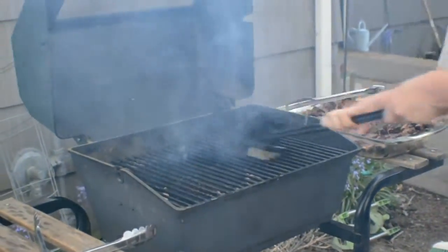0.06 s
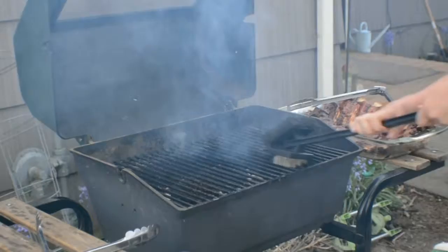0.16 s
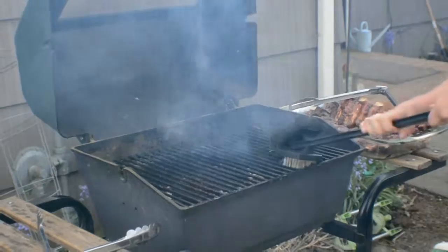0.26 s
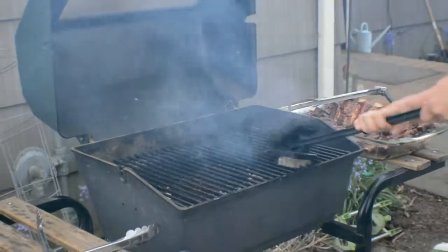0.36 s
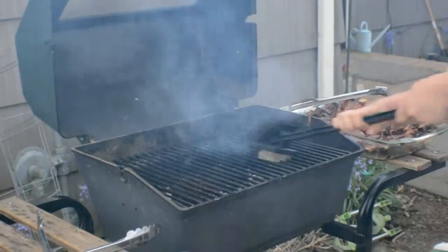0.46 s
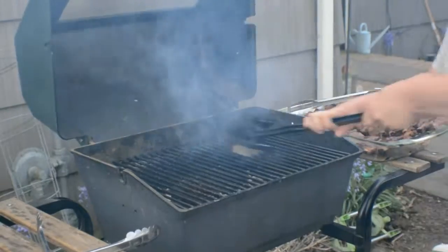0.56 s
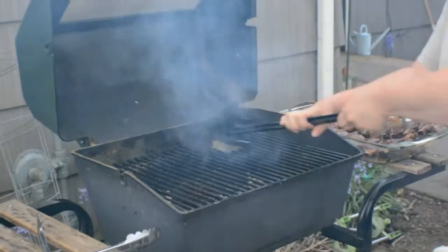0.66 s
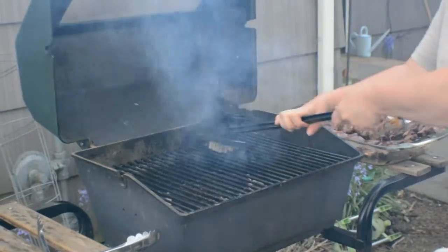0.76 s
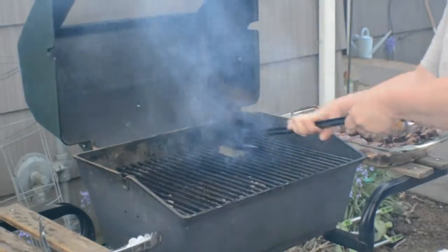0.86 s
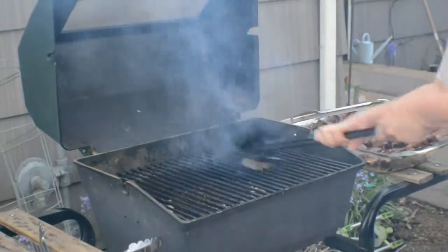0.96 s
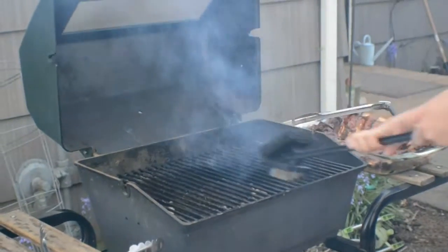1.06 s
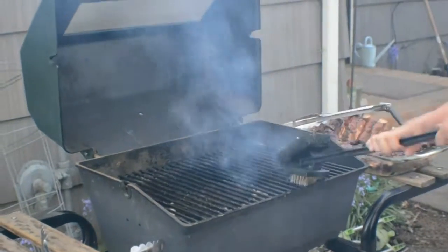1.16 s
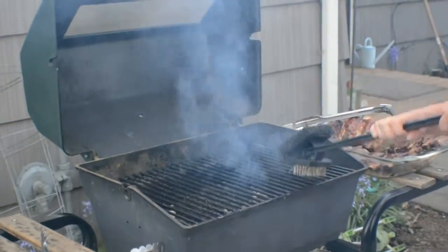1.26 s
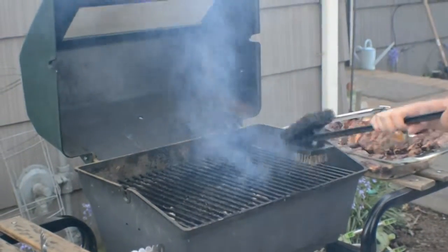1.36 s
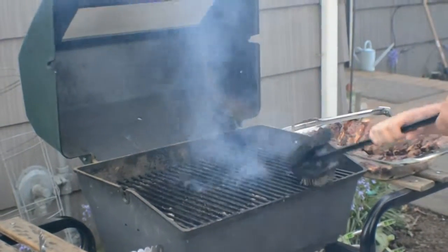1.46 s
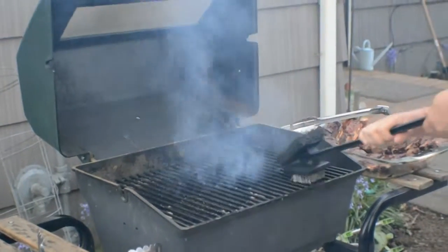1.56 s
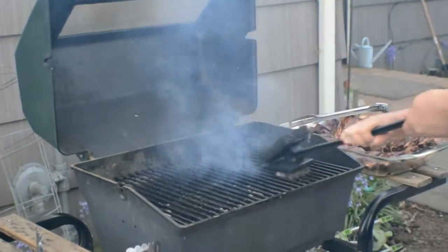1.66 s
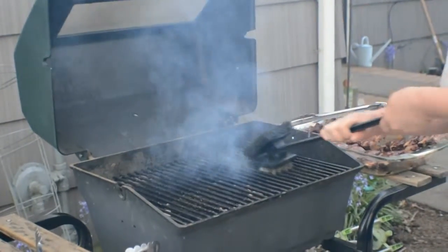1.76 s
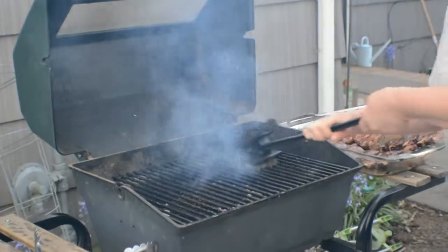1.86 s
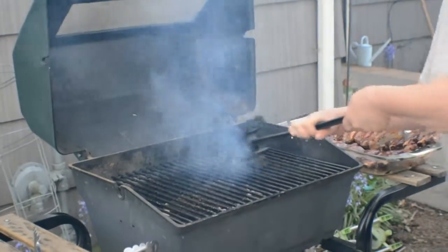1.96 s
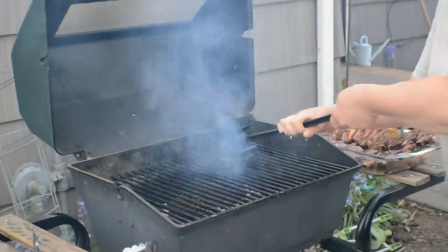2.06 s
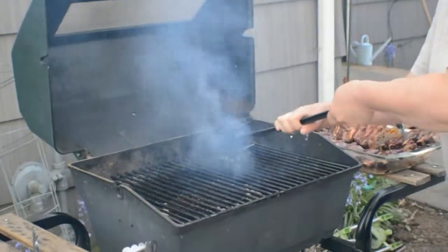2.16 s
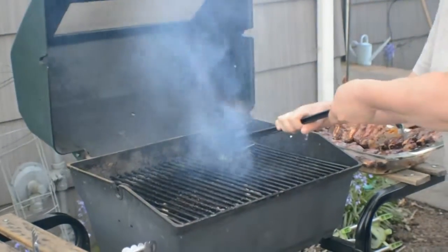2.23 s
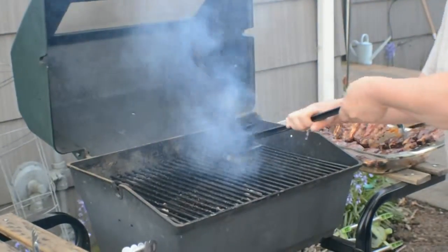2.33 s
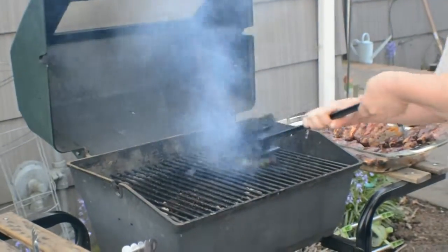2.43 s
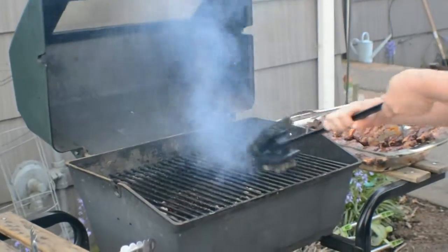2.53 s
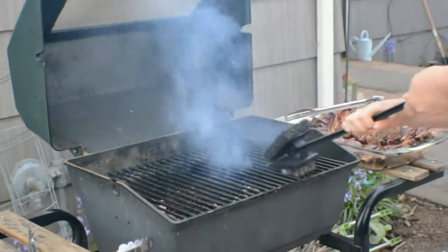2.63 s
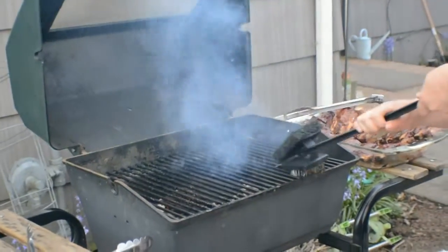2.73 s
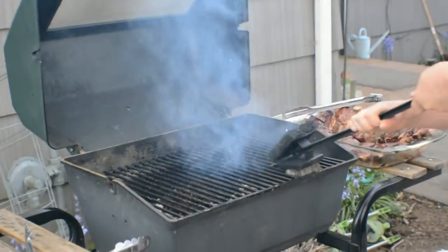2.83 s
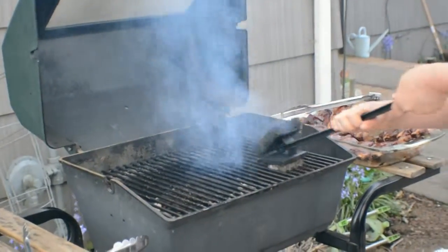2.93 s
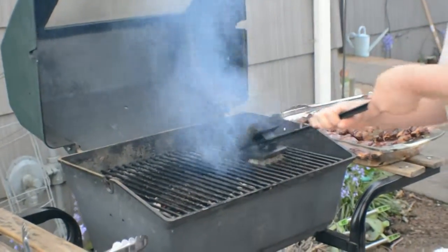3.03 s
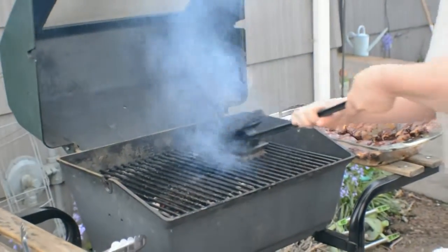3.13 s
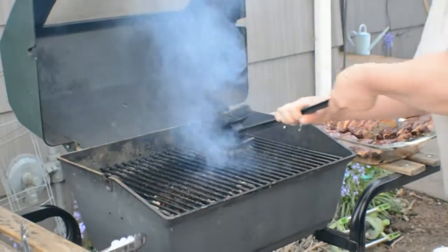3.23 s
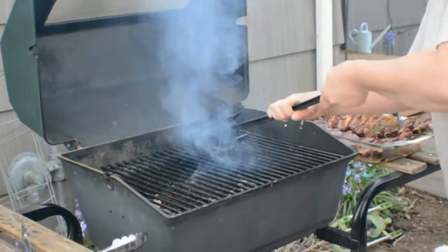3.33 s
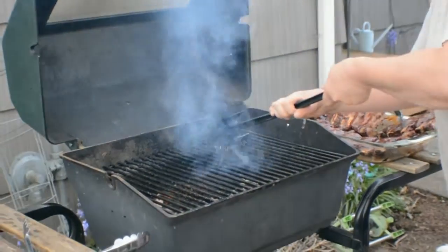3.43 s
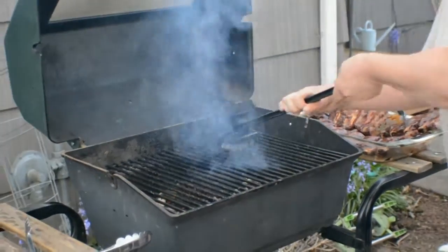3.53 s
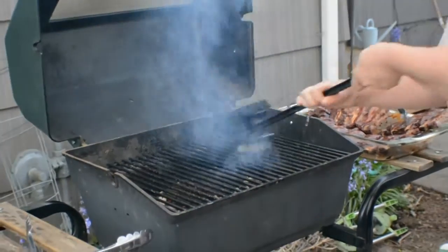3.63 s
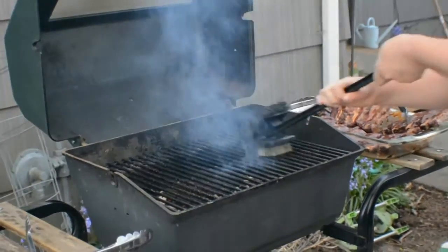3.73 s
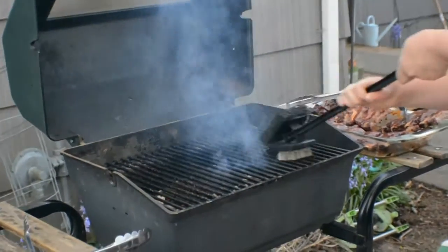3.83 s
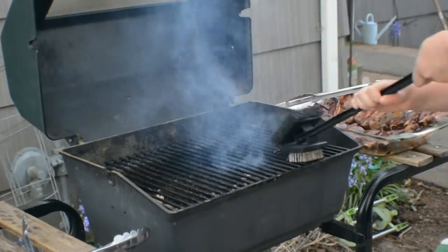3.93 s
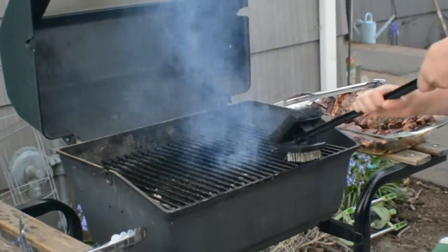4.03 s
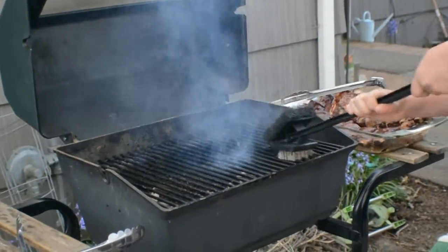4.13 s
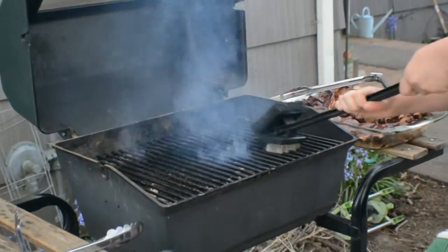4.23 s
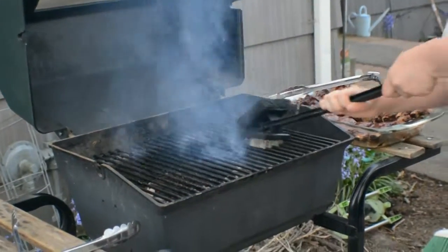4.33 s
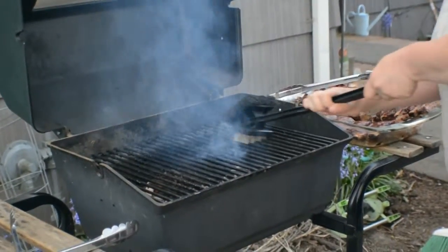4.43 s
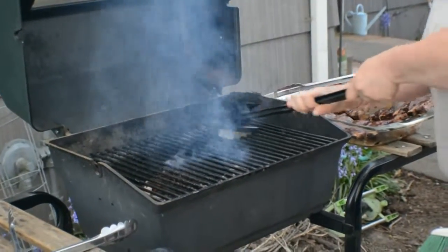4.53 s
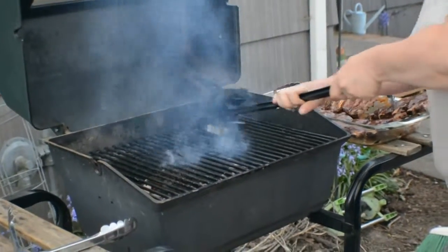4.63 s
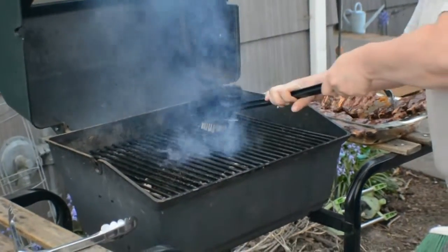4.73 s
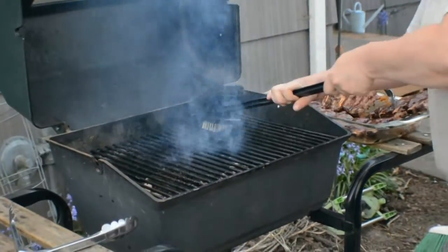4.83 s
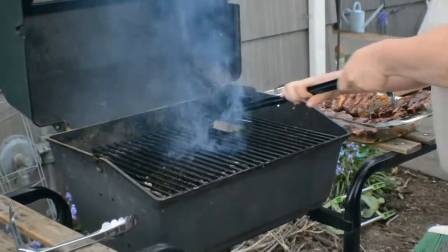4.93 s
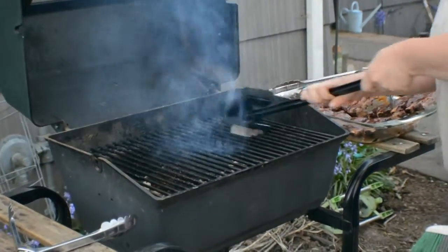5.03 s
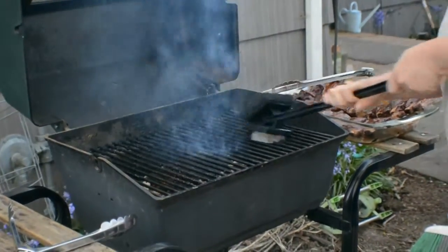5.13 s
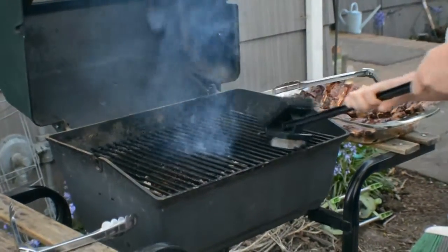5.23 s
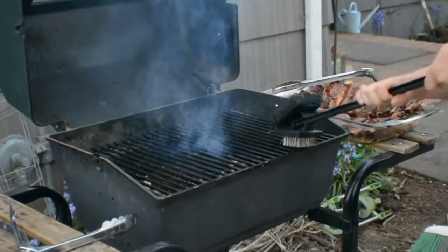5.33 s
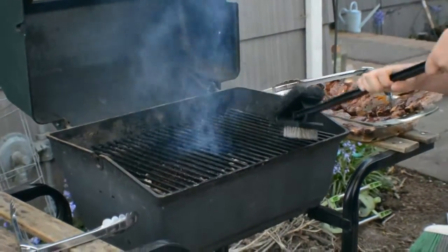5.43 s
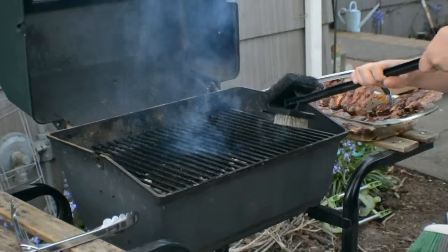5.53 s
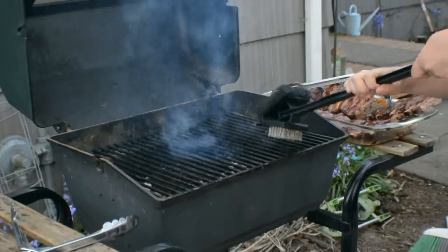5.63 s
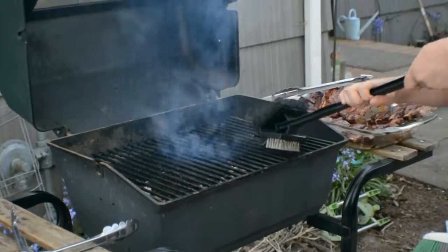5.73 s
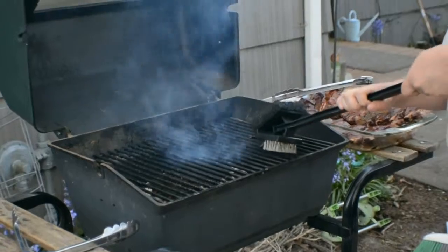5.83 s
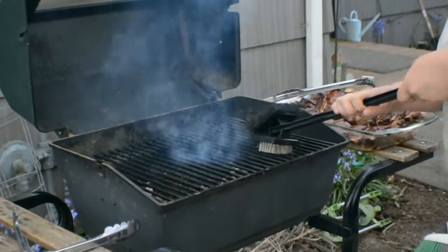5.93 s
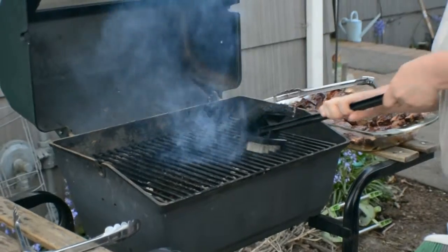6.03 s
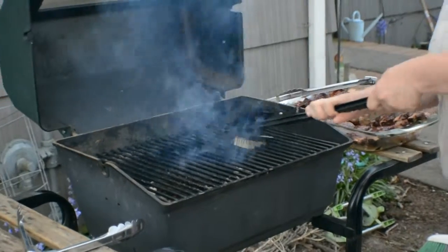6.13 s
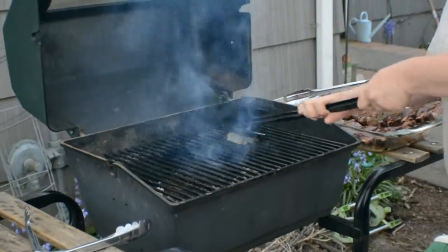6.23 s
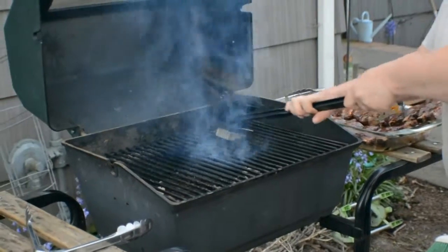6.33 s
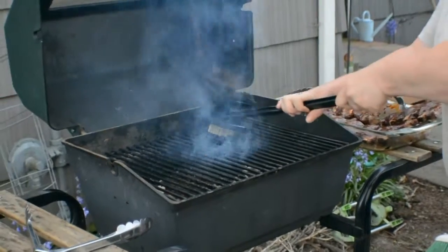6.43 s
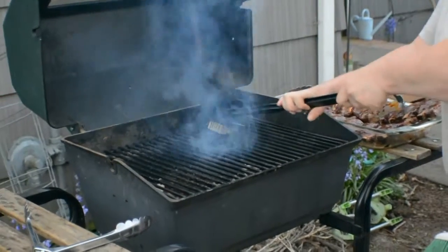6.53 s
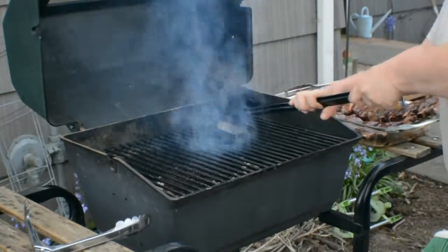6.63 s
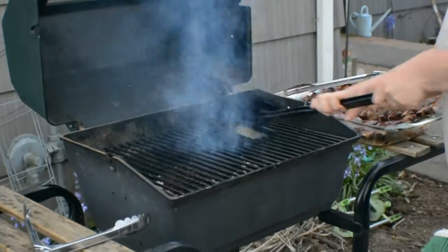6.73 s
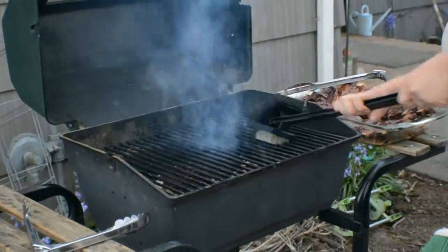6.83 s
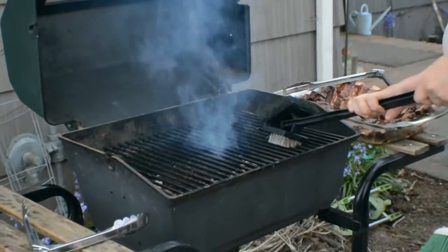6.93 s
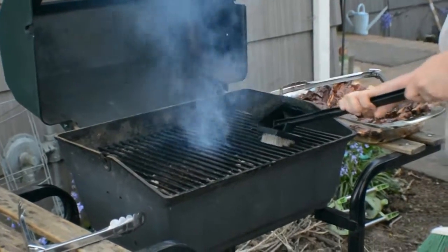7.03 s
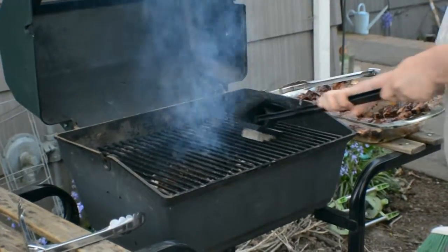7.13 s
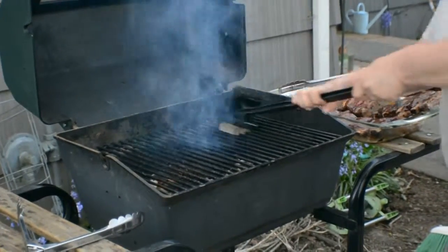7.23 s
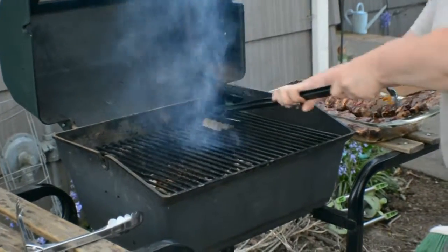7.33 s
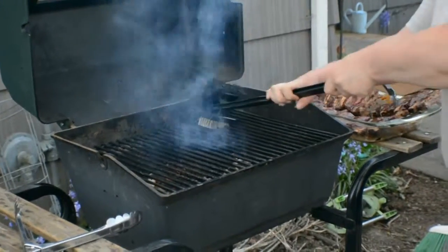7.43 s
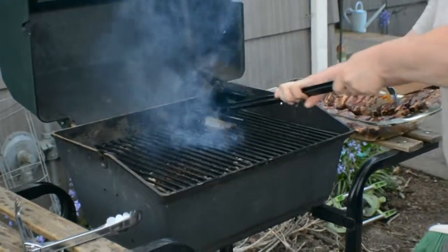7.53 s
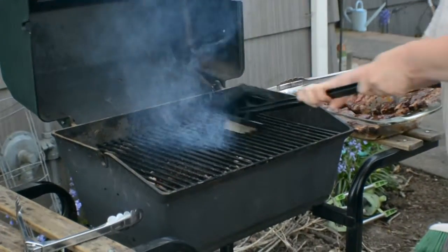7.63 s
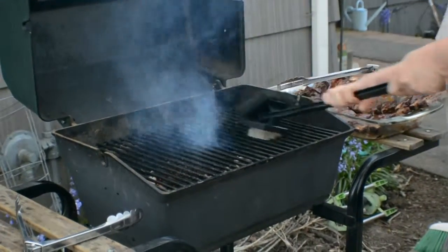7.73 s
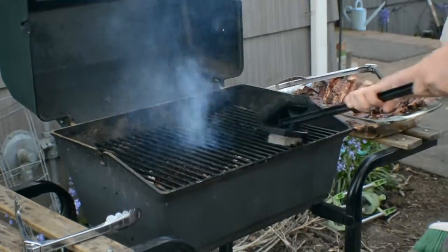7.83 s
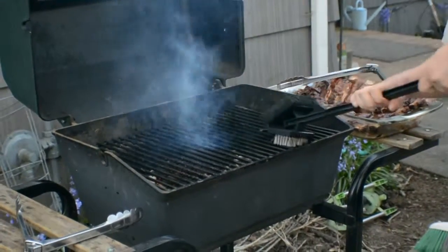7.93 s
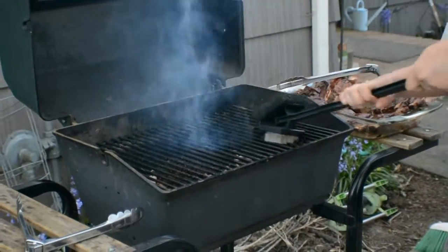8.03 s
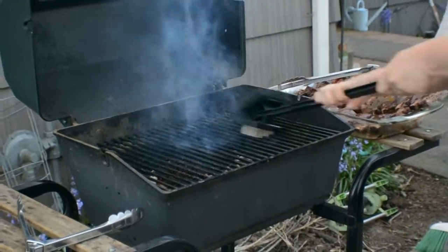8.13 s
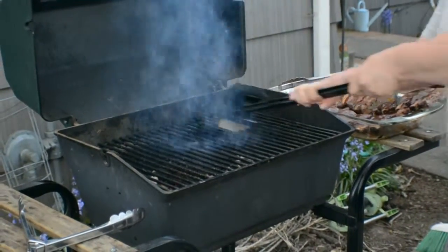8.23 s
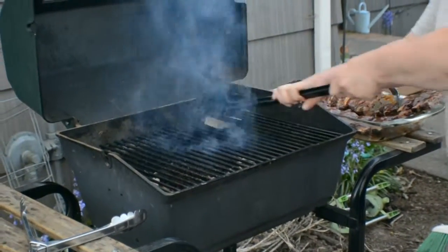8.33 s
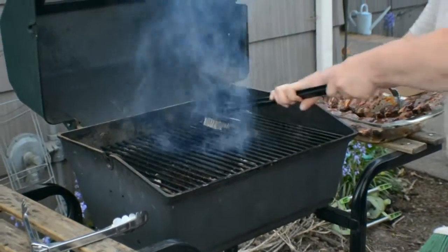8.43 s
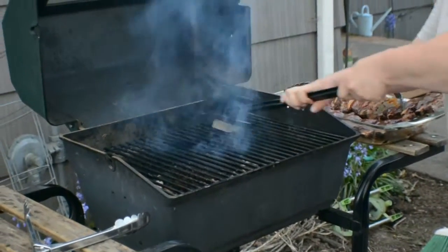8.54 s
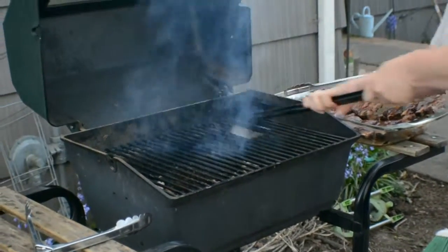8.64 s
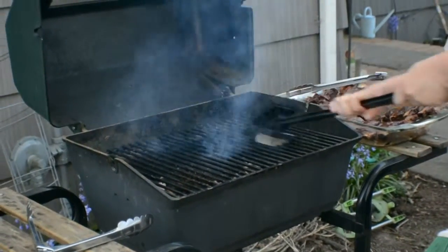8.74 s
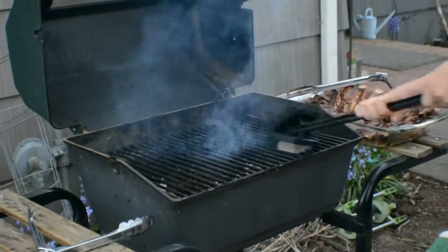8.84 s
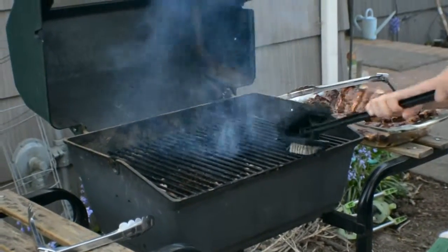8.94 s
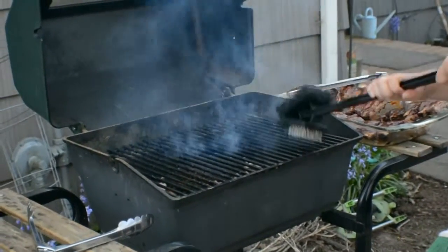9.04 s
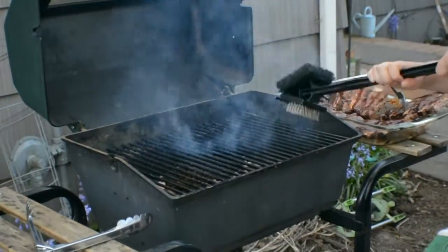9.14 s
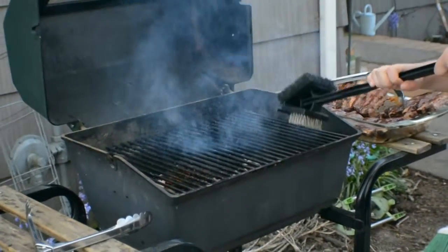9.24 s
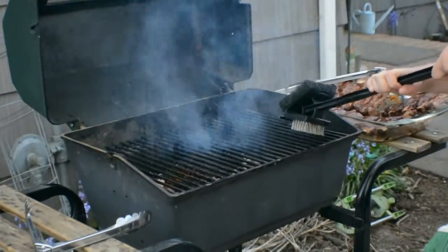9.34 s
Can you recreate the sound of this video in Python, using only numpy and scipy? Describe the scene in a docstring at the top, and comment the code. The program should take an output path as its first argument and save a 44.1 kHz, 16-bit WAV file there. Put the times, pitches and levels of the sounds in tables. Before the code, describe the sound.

Loud, short metallic knocks ring from a hollow steel box as a brush shoves a loose grate back and forth. Between them the wires drag with a dry, low rub and light hiss, occasionally squeaking or springing free. After a break of about a second with a faint bird-like whistle, the brush lands again and scrubs on faster. Close, nearly mono outdoor pickup with little echo and quiet background air.

```python
"""A loose charcoal-grill grate thuds and clangs on its steel firebox as a wire brush scrubs it in a backyard.
Each knock is noise shaped by the modes of the steel, with a few sine modes at a pitch the contact point favours.
Between knocks, random impulses of slipping wires excite resonances: low rub and rasp of bars, hiss of wires.
The brush head lands in decaying sines and a noise burst; wires squeal as wavering sines; bristles chatter and
flick free in impulse bursts. Behind lie a faint gliding sine, likely a bird, and a soft outdoor noise."""
import sys
import numpy as np
from scipy import signal
from scipy.fft import rfft, irfft, next_fast_len
from scipy.io import wavfile
from scipy.ndimage import uniform_filter1d, minimum_filter1d, map_coordinates

SR = 44100
rng = np.random.default_rng(int(sys.argv[2]) if len(sys.argv) > 2 else 0)


def store_wav(level_fs):
    """Save 16-bit WAV to argv[1]."""
    pcm = np.round(np.clip(np.atleast_2d(level_fs), -1, 1) * 32767)
    wavfile.write(sys.argv[1], SR, pcm.T.astype(np.int16))


N = 413658  # length in samples

# resonances of grate and firebox: [f/Hz, width/Hz, level above the dense modes/dB]
GRILL_MODES = [(179, 43, 12), (272, 15, -1), (480, 6.7, 8.5), (569, 38, 9), (700, 72, 5.5), (840, 88, 6),
               (979, 75, 5.5), (1204, 16, 9.5), (1334, 48, 5.5), (1420, 56, 5), (1546, 45, 6),
               (1692, 23, 3), (1856, 130, 3), (1990, 48, -4.5), (2220, 23, 9), (2450, 37, 6.5),
               (2675, 33, 4), (2725, 120, 4.5), (2945, 120, 2.5), (3446, 61, 7.5), (3743, 68, 9),
               (4350, 75, 5), (4870, 140, 8.5), (5740, 27, 9), (6920, 110, 7), (7250, 110, -3),
               (7600, 40, 2), (7920, 95, 7.5), (9100, 90, 1)]
# spectrum of the dense modes of the struck steel: [f/Hz, relative density/dB per Hz]
STEEL_SPECTRUM = [(30, -47), (115, -63), (150, -21.5), (190, -8), (300, 5.5), (500, -0.5), (700, 2),
                  (1100, -2.5), (2000, -1), (3200, -13), (5000, -22), (7500, -28.5), (9000, -33),
                  (11800, -39.5), (13000, -54), (15500, -61)]
# stereo side gain against mid for all sounds of the grill: [f/Hz, level/dB]
GRILL_SIDE = [(100, -75), (600, -44.5), (1400, -28), (2800, -22.5), (5500, -13), (10000, -15.5)]
# passes of the brush along the bars; pushes swell as the arm leans in, pulls just fade:
# [start t/s, length/s, rub level/dB, rasp level/dB, hiss level/dB, swell/dB], levels before swell and fade
BRUSH_STROKES = [(-.2, 0.54, -42, -47.5, -56.5, -2), (0.365, 0.47, -47, -52, -57.5, 9.5),
                 (0.883, 0.38, -45.5, -47.5, -55.5, -0.5), (1.543, 0.68, -46.5, -52, -61, 10.5),
                 (2.28, 0.6, -50, -50, -58.5, 0), (2.858, 0.61, -42.5, -49, -58, 9),
                 (3.55, 0.71, -47.5, -49.5, -58.5, -3.5), (4.172, 0.662, -42.5, -52, -60, 4),
                 (4.9, 0.57, -46, -50.5, -58.5, -0.5), (6.006, 0.55, -41.5, -47.5, -60.5, -1.5),
                 (6.593, .4, -37.5, -48, -61, 1.5), (7.067, 0.42, -43.5, -54, -60.5, 8.5),
                 (7.53, .45, -43, -51.5, -59, -0.5), (7.995, 0.51, -46, -52, -60, 7.5),
                 (8.53, 0.55, -44.5, -51.5, -59.5, -4)]


def amp(db):
    """Level definition: decibels to amplitude gain."""
    return 10 ** (np.asarray(db) / 20)


def unit(x):
    """Normalization: x at rms 1."""
    return x / np.sqrt(np.mean(x ** 2) + 1e-20)


def along(points, hz):
    """Logarithmic frequency scale: interpolate (Hz, value) points along it."""
    f, v = np.transpose(points)
    return np.interp(np.log(hz + 1), np.log(f + 1), v)


def wobble(rate):
    """Slow random modulation: a smooth curve through rate random knots a second."""
    knots = rng.standard_normal(int(N * rate / SR) + 4)
    return map_coordinates(knots, [np.arange(N) * rate / SR], order=2)


def filtered(x, response):
    """Linear filtering: multiply the spectrum of x by a frequency response."""
    size = next_fast_len(N + 8192)
    hz = np.fft.rfftfreq(size, 1 / SR)
    return irfft(rfft(x, size) * response(hz), size)[..., :N]


def below(hz, edge_hz):
    """Steep low-pass magnitude response."""
    return 1 / np.sqrt(1 + (hz / edge_hz) ** 16)


def above(hz, edge_hz):
    """Power-complementary high-pass: its power and that of below() add to one."""
    return np.sqrt(1 - below(hz, edge_hz) ** 2)


def body(spectrum, peaks, ripple_db, spacing_hz):
    """Modal response of a metal part: a broad slope, strong resonances and a crowd of small ones."""
    grid = np.arange(0, SR / 2, 2)
    strong = sum(db / (1 + (2 * (grid - hz) / width) ** 2) for hz, width, db in peaks)
    crowd = map_coordinates(rng.standard_normal(len(grid)), [grid / spacing_hz], order=2)
    gain = amp(along(spectrum, grid) + strong + ripple_db * crowd)
    return lambda hz: np.interp(hz, grid, gain)


def stereo(drive, response, width):
    """Mid-side principle: two unrelated drives, coloured alike, make a pair whose width varies with pitch; rms 1."""
    def mid_side(hz):
        return response(hz) * np.array([np.ones_like(hz), amp(along(width, hz))])
    mid, side = filtered(drive, mid_side)
    return unit(np.array([mid + side, mid - side]))


def noise():
    """Broadband excitation: two independent white noises."""
    return rng.standard_normal((2, N))


def slips(rate):
    """Stick-slip excitation: wire tips let go one by one, on average rate a second, with uneven force."""
    spread_db = 1.5
    slipping = rng.random(N) < rate / SR
    return noise() * slipping * amp(spread_db * rng.standard_normal(N))


def steady(x, smooth_s):
    """Envelope flattening: even out the slow swells of a noise, so that each blow delivers its full energy."""
    power = uniform_filter1d(np.mean(x ** 2, axis=0), max(int(smooth_s * SR), 2))
    return x / np.sqrt(np.abs(power) + 1e-6)


def blows():
    """Energy partition: brightness shares each contact out as (s, thud dB, clang dB, crash dB, hardness, Hz)."""
    # the shoved grate strikes the firebox: [t/s, level/dB, brightness from thud 0 to clang 1,
    # hardness (scales the contact burst), centre of the favoured modes f/Hz]
    knocks = [(0.41, -14.5, 0.47, 2.24, 260), (.88, -17.5, 0.25, 0.82, 609), (.896, -18, 0.88, 0.69, 815),
              (1.628, -11, 0.59, 1.06, 1034), (2.324, -12.5, 0.37, 0.85, 603), (2.36, -17, 0.95, 1.1, 940),
              (2.917, -16.5, 0.75, 0.56, 681), (3.556, -15, .14, 1.5, 637), (3.569, -14, 0.94, 0.14, 952),
              (4.184, -19.7, 0.53, 1.8, 266), (4.916, -17.5, 0.32, 1.4, 434),
              (4.931, -15, 0.97, 0.96, 1220), (6.054, -17.5, 0.65, .3, 713), (6.631, -24, 0.04, 1.3, 675),
              (6.646, -18.5, 0.92, 0.61, 856), (7.092, -14.5, 0.79, 1.4, 936), (7.563, -25, 0.03, 2.6, 289),
              (7.5782, -22.5, 0.94, 2.2, 998), (8.047, -12.5, 0.75, .89, 259.5),
              (8.549, -15.5, .24, 0.97, 652), (8.563, -16.5, 0.94, 0.16, 1065)]
    # the bristles catch and the grate shifts in its seat: [t/s, level/dB]
    catches = [(.001, -32.5), (.389, -23.5), (2.894, -21), (3.53, -25.5), (4.146, -28.5), (4.889, -28.5),
               (6.031, -26.5), (6.588, -28.5), (7.073, -22), (7.315, -35.5), (7.511, -30.5), (8.028, -20),
               (8.527, -28), (9.315, -45)]
    # every catch is the same soft contact
    catch_brightness, catch_hardness, catch_hz, catch_crash_db = 0.59, 0.11, 701.6, -4
    # crash against clang in an evenly bright knock, and extra dB for each dB of clang over thud
    crash_offset_db, crash_growth = -13.5, 0.63
    soft = [(s, db, catch_brightness, catch_hardness, catch_hz) for s, db in catches]
    s, db, brightness, hardness, hz = np.transpose(list(knocks) + soft)
    brightness = np.clip(brightness, 0.01, 0.99)
    thud_db = db + 10 * np.log10(1 - brightness)
    clang_db = db + 10 * np.log10(brightness)
    is_catch = np.arange(len(s)) >= len(knocks)
    crash_db = clang_db + crash_offset_db + crash_growth * (clang_db - thud_db) + catch_crash_db * is_catch
    return np.transpose([s, thud_db, clang_db, crash_db, hardness, hz])


def ring_down(column, t60, burst, burst_s, rise_s):
    """Exponential damping: each blow bursts at a hard contact, then dies away; the powers of all blows add."""
    t = np.arange(SR // 2) / SR
    ring = (1 - np.exp(-t / rise_s)) * 1000 ** (-t / t60)
    power = np.zeros(N + SR)
    for (s, *_, hardness, _), db in zip(blows(), column):
        contact = 1 + burst * max(hardness, 0) * np.exp(-t / burst_s)
        power[max(round(s * SR), 0):][:len(t)] += (amp(db) * contact * ring) ** 2
    return np.sqrt(power[:N])


def favoured():
    """Selective mode excitation: the contact point drives a few neighbouring modes harder, giving a pitch."""
    mode_db, t60_s, rise_s = -1, 0.14, 0.0014
    spread = 0.0887  # how far the modes lie around their centre, as a share of its pitch
    t = np.arange(SR // 2) / SR
    shape = (1 - np.exp(-t / rise_s)) * 1000 ** (-t / t60_s)
    out = np.zeros(N + SR)
    for s, thud_db, clang_db, *_, hz in blows():
        detune, phase = rng.uniform(-0.994, 1, size=(2, 5, 1))  # five modes
        mode_hz = hz * (1 + spread * detune)
        ring = shape * np.sin(2 * np.pi * mode_hz * t + np.pi * phase).sum(axis=0)
        # the clang counts less than the thud
        strength = amp(mode_db) * np.hypot(amp(thud_db), amp(clang_db - 9.5))
        same_energy = np.linalg.norm(shape) / np.linalg.norm(ring)
        out[max(round(s * SR), 0):][:len(t)] += strength * ring * same_energy
    return out[:N]


def grate():
    """Modal impact: knocks ring the crowded modes of the firebox (thud), the bars (clang), their edges (crash)."""
    _, thud_db, clang_db, crash_db, *_ = np.transpose(blows())
    steel = body(STEEL_SPECTRUM, GRILL_MODES, ripple_db=2, spacing_hz=9)
    low_hz, high_hz = 800, 3500
    thud = stereo(noise(), lambda hz: steel(hz) * below(hz, low_hz), GRILL_SIDE)
    clang = stereo(noise(), lambda hz: steel(hz) * above(hz, low_hz) * below(hz, high_hz), GRILL_SIDE)
    crash = stereo(noise(), lambda hz: steel(hz) * above(hz, high_hz), GRILL_SIDE)
    thud = steady(thud, smooth_s=0.038)
    clang = steady(clang, smooth_s=0.062)
    struck = favoured()
    struck = struck + thud * ring_down(thud_db, t60=0.28, burst=0.63, burst_s=0.015, rise_s=0.0047)
    struck = struck + clang * ring_down(clang_db, t60=0.29, burst=0.75, burst_s=0.011, rise_s=0.0006)
    struck = struck + crash * ring_down(crash_db, t60=0.21, burst=0.38, burst_s=0.015, rise_s=0.00082)
    # the grate chatters as it settles: a fast random level flutter
    rattle_db = 0.5 * wobble(160)
    # the small box radiates little bass
    high_pass = signal.butter(2, 135, "highpass", fs=SR, output="sos")
    return signal.sosfilt(high_pass, struck * amp(rattle_db))


def taps():
    """Impulse response of the brush head: as it lands, many wires strike in a cluster, ring its modes and spit."""
    # the brush head lands on the bars: [t/s, ring level/dB, spit level/dB], levels before mode gains and envelope
    landings = [(1.5244, -27.5, -39), (5.927, -30.5, -25.5)]
    # modes of the brush head and its wire block: [f/Hz, mean level/dB, t60/s]
    head_modes = [(1016, -3, 0.22), (1190, -7, 0.25), (1640, -2, 0.15), (1930, -13, 0.29), (2240, 0, 0.21),
                  (2640, -6, .16), (2890, -6, 0.14), (3530, -9, 0.14), (3870, -12, .08), (4050, -11, 0.16),
                  (5700, -22, 0.19), (6270, -25, .13), (7100, -19, .08)]
    # spectrum of the spit: (f/Hz, relative density/dB)
    tips = [(60, -50), (300, -17), (650, 1), (1500, 0.0), (4000, 9.5), (6500, -1.5), (9000, -5.0),
            (12000, -30), (15500, -48)]
    t = np.arange(SR // 2) / SR
    ping, spit = np.zeros(N + SR), np.zeros(N + SR)
    for s, db, spray_db in landings:
        start = round(s * SR)
        for hz, level, t60 in head_modes:
            # the loose wires blur each mode: its phase drifts (in cycles)
            drift = np.cumsum(rng.standard_normal(len(t))) * 0.017
            decay = amp(db + level + rng.normal(0, 1.5) - 60 * t / t60)
            ring = decay * np.sin(2 * np.pi * (hz * t + drift))
            ping[start:][:len(t)] += ring * (1 - np.exp(-t / 0.001))
        fall = np.exp(-t / 0.0059) * 1.97 + 0.24 * np.exp(-t / 0.053)
        spit[start:][:len(t)] += amp(spray_db) * fall * (1 - np.exp(-t / 0.0019))
    spray = stereo(noise(), lambda hz: amp(along(tips, hz)), GRILL_SIDE)
    return ping[:N] + spit[:N] * spray


def stroke_level(column, follows):
    """Friction loudness follows speed and pressure: attack, a slow fade with a swell on it, release."""
    attack_s, release_s = 0.049, 0.092  # the brush gets going, and slows to a stop
    fade_db = 8.5  # fall of the drag from start to end of a stroke, before it is scaled by follows
    swell_at, swell_width = 0.69, 0.24  # where the arm leans in hardest and for how long, shares of the stroke
    t = np.arange(N) / SR
    level = np.zeros(N)
    for (start, length, *_, swell_db), db in zip(BRUSH_STROKES, column):
        on = (t > start) & (t < start + length)
        age = t[on] - start
        way = age / length
        speed = np.clip(np.minimum(age / attack_s, (length - age) / release_s), 0, 1)
        swell = swell_db * np.exp(-((way - swell_at) / swell_width) ** 2)
        lean_db = swell - fade_db * (way - 0.5)
        level[on] += speed * amp(db + follows * lean_db)
    return level


def shifting(x, depth_db):
    """Position-dependent excitation: as the contact point moves, different resonances swell and fade."""
    z = signal.stft(x, nperseg=1024)[2]
    field = rng.standard_normal(z.shape[1:])
    field = uniform_filter1d(field, size=3, axis=0)  # smooth over frequency
    field = uniform_filter1d(field, size=14, axis=1)  # smooth over time
    return signal.istft(z * amp(depth_db * unit(field)), nperseg=1024)[1][:, :N]


def brush():
    """Stick-slip friction: slipping wires shake the bars (rub, rasp) and ring at their own pitches (hiss)."""
    # spectrum of bars being rubbed: [f/Hz, relative density/dB per Hz]
    rub_spectrum = [(60, -36), (150, -10), (280, 3), (520, -2.5), (750, 1), (1100, 0.5), (1550, -3),
                    (2000, 1), (2450, -7.5), (4000, -12.5), (6200, -31)]
    # resonances that the rubbing feeds: [f/Hz, width/Hz, level/dB]
    bar_modes = [(363, 15, 2), (729, 69, 10), (1020, 44, 3), (1990, 190, 5.5), (2630, 30, 9.5),
                 (2900, 91, 8.5), (3430, 110, 8.5), (4140, 190, 8.5), (4460, 90, 8), (4750, 130, 9),
                 (5500, 90, -1), (5750, 80, 14)]
    # spectrum of the hissing wire tips: [f/Hz, relative density/dB per Hz]
    hiss_spectrum = [(5000, 18.5), (6600, -2.5), (8500, -1.5), (10500, -3), (11250, -9), (11450, -11),
                     (13300, -12), (15500, -22)]
    # the wires' own resonances: [f/Hz, width/Hz, level/dB]
    wire_modes = [(7120, 220, 5.5), (7400, 170, 11), (7900, 180, 3), (9080, 300, 4.5), (11030, 130, 11.5),
                  (11240, 130, 12.5)]
    _, _, rub_db, rasp_db, hiss_db, _ = np.transpose(BRUSH_STROKES)
    bars = body(rub_spectrum, bar_modes, ripple_db=3.5, spacing_hz=12)
    wires = body(hiss_spectrum, wire_modes, ripple_db=3.5, spacing_hz=13)
    low_hz, high_hz = 1500, 6300
    rub = stereo(slips(rate=2500), lambda hz: bars(hz) * below(hz, low_hz), GRILL_SIDE)
    rasp = stereo(slips(rate=3600), lambda hz: bars(hz) * above(hz, low_hz) * below(hz, high_hz), GRILL_SIDE)
    hiss = stereo(slips(rate=11000), lambda hz: wires(hz) * above(hz, high_hz), GRILL_SIDE)
    # each register takes its own share of the swell and fade
    scrape = rub * stroke_level(rub_db, follows=0.65)
    scrape = scrape + rasp * stroke_level(rasp_db, follows=0.85)
    scrape = scrape + hiss * stroke_level(hiss_db, follows=0.53)
    # burnt-on crust makes the drag uneven
    crust_db = 1.0 * wobble(45)
    return shifting(amp(crust_db) * scrape, depth_db=2.5)


def chatter():
    """Intermittent contact: clumps of wire snag on crust and rattle the modes of the grate."""
    # bursts of bristles chattering over crust: [t/s, length/s, level before the envelope/dB]
    bursts = [(6.295, 0.091, -56), (6.367, 0.034, -37.5), (6.77, 0.063, -38), (6.864, 0.025, -37)]
    t = np.arange(N) / SR
    level = np.zeros(N)
    for s, length, db in bursts:
        times = [s - 0.005, s + 0.005, s + length, s + length + 0.03]
        level += amp(db) * np.interp(t, times, [0.011, 0.97, 0.58, 0.032])
    steel = body(STEEL_SPECTRUM, GRILL_MODES, ripple_db=4.0, spacing_hz=21)
    return level * stereo(slips(rate=740), steel, GRILL_SIDE)


def squeals():
    """Self-excited oscillation: stick and slip pump a few narrow resonances, each swelling in its own time."""
    # the wires grip and sing: [start t/s, end t/s, level/dB]
    grips = [(1.924, 2.187, -53), (3.052, 3.41, -47.5), (4.417, 4.776, -49.5), (6.1, 6.398, -68)]
    # singing resonances: [f/Hz, width (scales the pitch wander and its rate)/Hz, relative level/dB]
    singing_modes = [(1940, 160, 2.5), (2190, 120, -2), (2700, 12, 0), (3000, 60, -5), (3400, 85, -8),
                     (3960, 35, -2.5), (4040, 55, -4.5), (5000, 32, -8)]
    t = np.arange(N) / SR
    grip = np.zeros(N)
    for start, end, db in grips:
        grip += amp(db) * np.interp(t, [start, start + 0.057, end - 0.08, end], [0, 1, 1, 0])
    voice = np.zeros(N)
    for hz, width, db in singing_modes:
        phase = 2 * np.pi * np.cumsum(hz + width * wobble(2 * width)) / SR
        swell_db = 2 * wobble(9) + 4 * wobble(2 * width)
        voice += amp(db + swell_db) * np.sin(phase)
    return grip * unit(voice)


def flicks():
    """Elastic release: bent bristles spring free in a short bright spray."""
    # the bristles spring off the end of a bar: [t/s, length/s, level before the envelope/dB]
    releases = [(0.772, .015, -40.5), (1.215, 0.06, -38), (4.27, .035, -46), (5.347, 0.06, -38),
                (8.21, .02, -60), (8.994, 0.065, -42.5)]
    # spectrum of the spray: (f/Hz, relative density/dB)
    spray = [(500, -20), (1300, 4), (2000, 8), (2200, 15), (2400, -1), (3200, -2.0), (7000, -5.5),
             (11000, -7.5), (13000, -17), (15500, -26)]
    t = np.arange(N) / SR
    level = np.zeros(N)
    for s, length, db in releases:
        times = [s - 0.008, s + 0.02, s + length, s + length + 0.018]
        level += amp(db) * np.interp(t, times, [0.017, 0.57, 0.26, 0.0])
    return level * stereo(slips(rate=9800), lambda hz: amp(along(spray, hz)), GRILL_SIDE)


def bird():
    """Frequency modulation: one thin, wavering whistle from afar is a sine gliding between pitches."""
    # a faint far-off whistle, likely a bird: [t/s, f before wavering/Hz, level before wavering/dB]
    whistle = [(5.66, 3550, -74), (5.73, 3420, -62), (5.80, 3200, -62), (5.86, 3340, -62),
               (5.93, 3230, -62), (5.96, 3200, -80)]
    t = np.arange(N) / SR
    s, hz, db = np.transpose(whistle)
    level = amp(np.interp(t, s, db) + 3.5 * wobble(43))
    sounding = (t > s[0]) * (t < s[-1])
    pitch_hz = np.interp(t, s, hz) + 25 * wobble(120)
    return level * sounding * np.sin(2 * np.pi * np.cumsum(pitch_hz) / SR)


def yard():
    """Diffuse ambient noise: a soft outdoor rush, coloured, wide in the treble and gently wavering in level."""
    # outdoor background: [f/Hz, relative density/dB per Hz]
    rush_spectrum = [(20, -40), (40, -29), (75, -6), (150, -4.5), (235, -1), (300, -3), (365, 2),
                     (430, -0.5), (1050, 1.5), (2100, -13), (3200, -18.5), (4200, -22), (11000, -32.5),
                     (15500, -47)]
    # side gain against mid: [f/Hz, level/dB]
    rush_side = [(30, -9), (100, -27), (250, -22.5), (1000, -17.5), (3000, -4.5), (9000, -4), (13000, -3)]
    level_db = -46 + 1.7 * wobble(6.8)
    return amp(level_db) * stereo(noise(), lambda hz: amp(along(rush_spectrum, hz)), rush_side)


def scene():
    """Superposition: grate, brush and yard sound together."""
    return grate() + taps() + brush() + chatter() + squeals() + flicks() + bird() + yard()


def record(dry):
    """Peak limiting and band limiting: a fast limiter holds peaks at full scale, then the top band is cut."""
    top_hz = 15700
    needed = 1 / np.maximum(np.abs(dry).max(axis=0), 1)
    gain = uniform_filter1d(minimum_filter1d(needed, size=100), size=100)  # sizes in samples
    return filtered(dry * gain, lambda hz: hz < top_hz)


dry = scene()
out = record(dry)
store_wav(out)
```